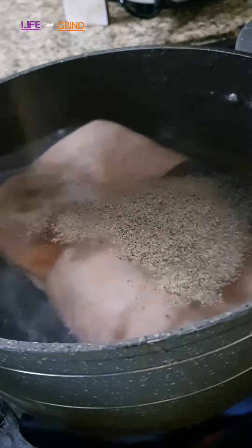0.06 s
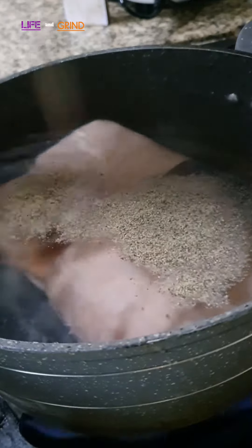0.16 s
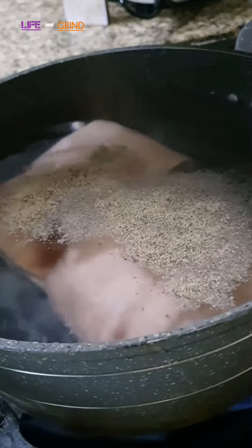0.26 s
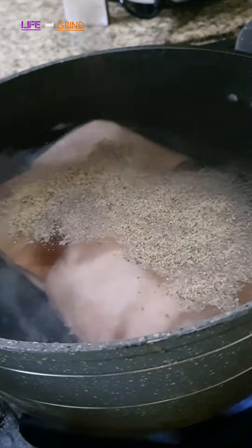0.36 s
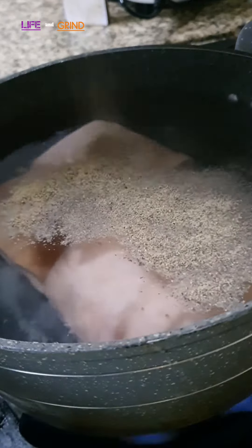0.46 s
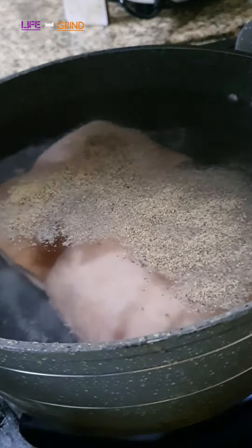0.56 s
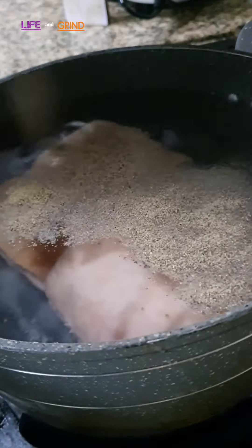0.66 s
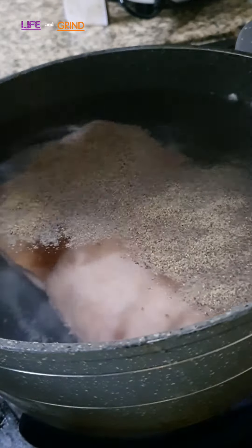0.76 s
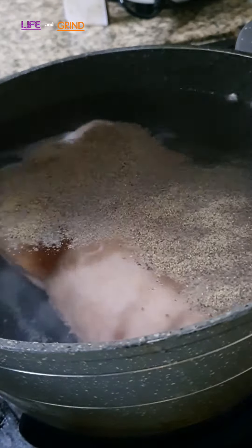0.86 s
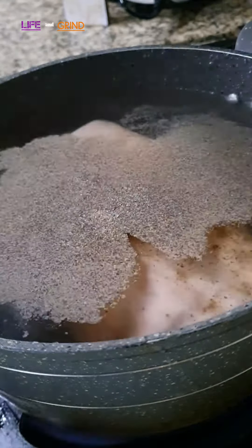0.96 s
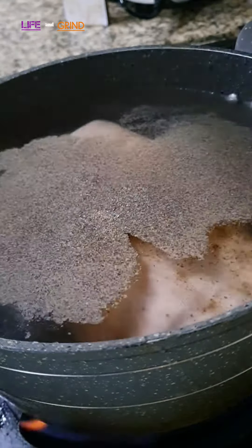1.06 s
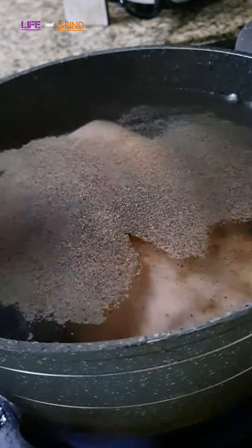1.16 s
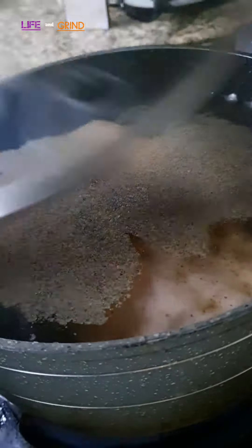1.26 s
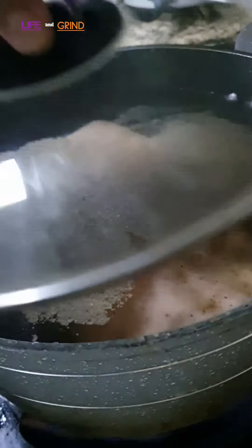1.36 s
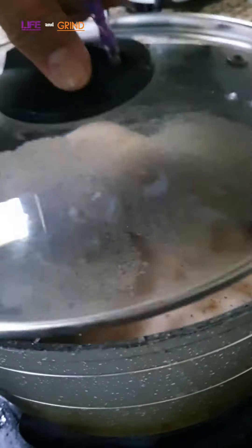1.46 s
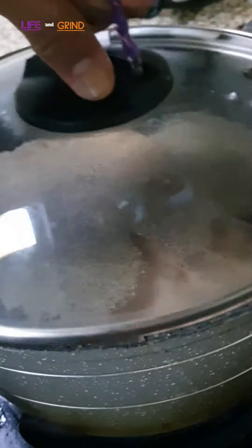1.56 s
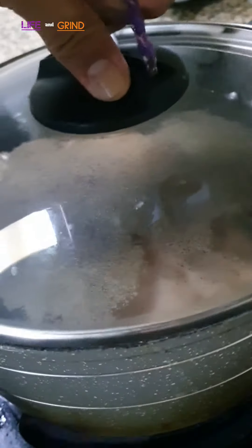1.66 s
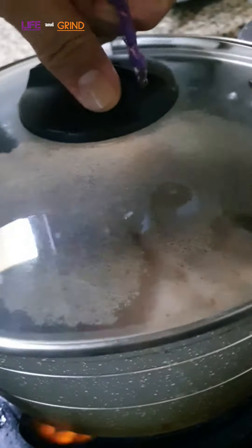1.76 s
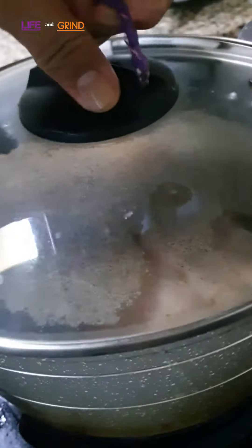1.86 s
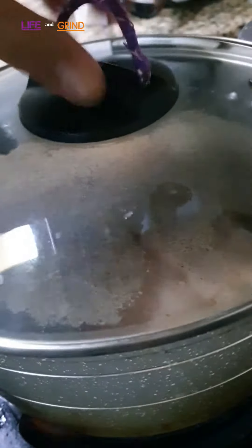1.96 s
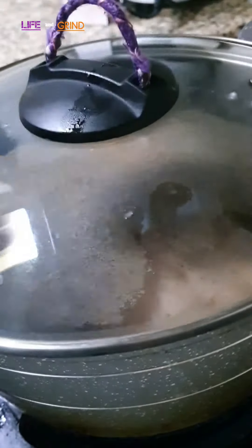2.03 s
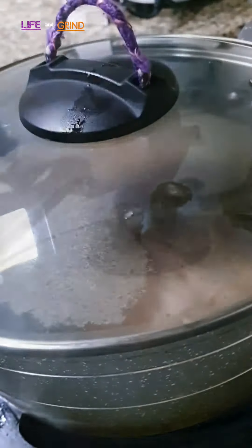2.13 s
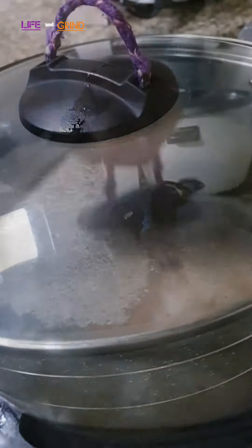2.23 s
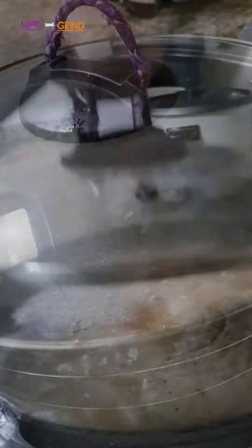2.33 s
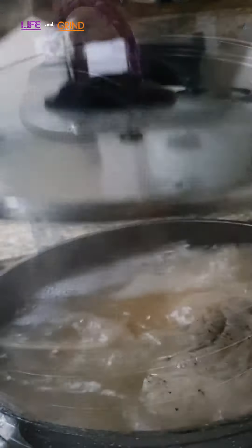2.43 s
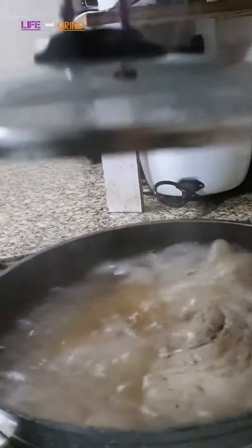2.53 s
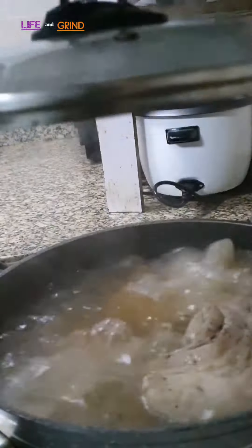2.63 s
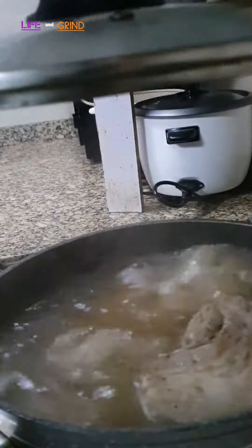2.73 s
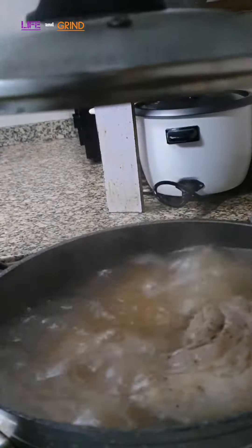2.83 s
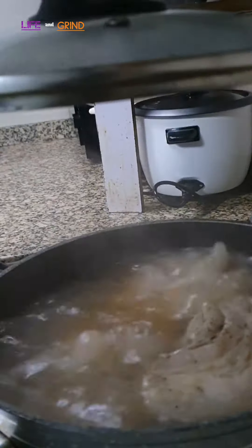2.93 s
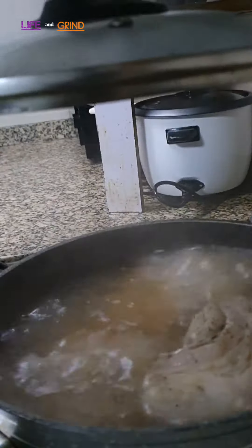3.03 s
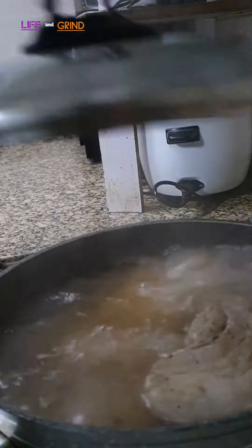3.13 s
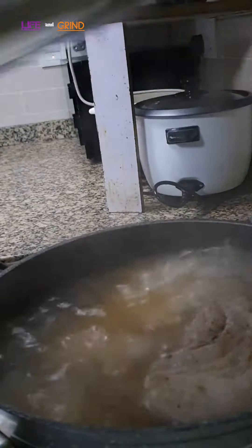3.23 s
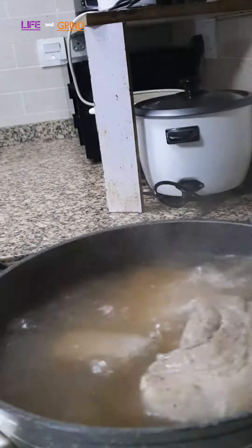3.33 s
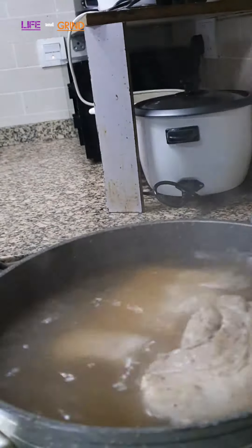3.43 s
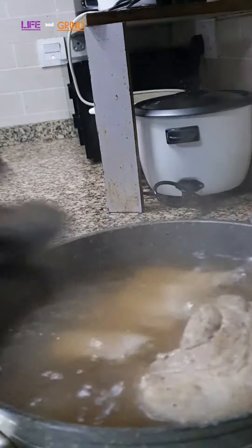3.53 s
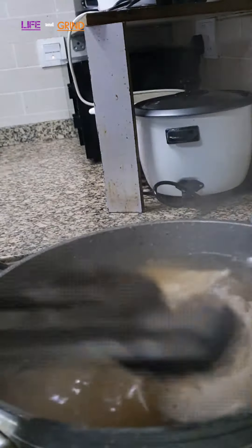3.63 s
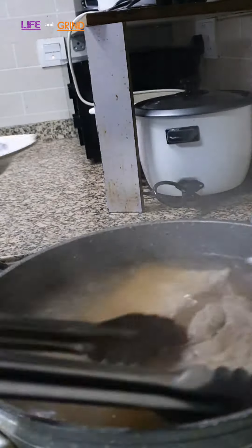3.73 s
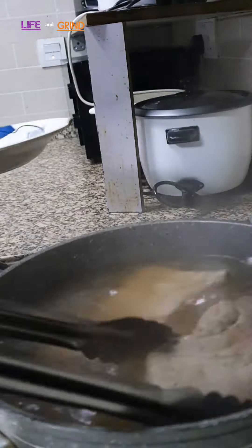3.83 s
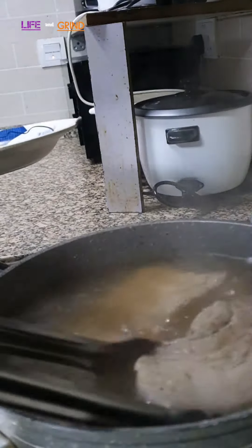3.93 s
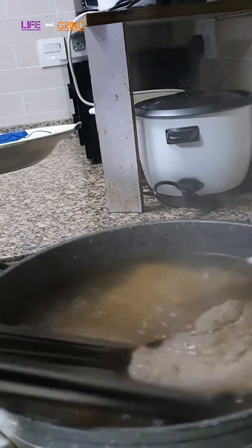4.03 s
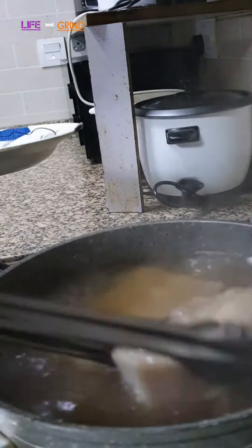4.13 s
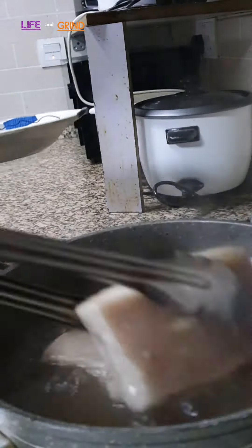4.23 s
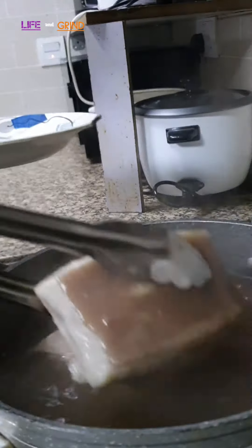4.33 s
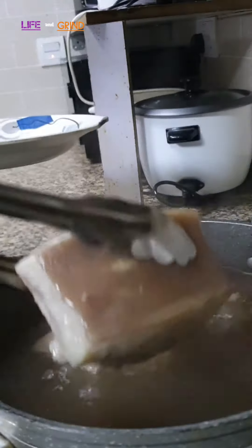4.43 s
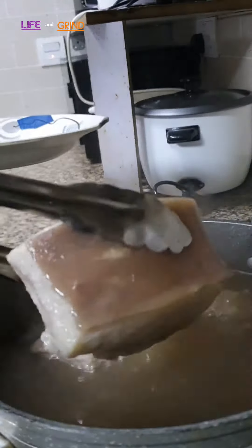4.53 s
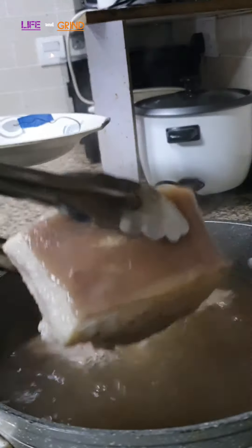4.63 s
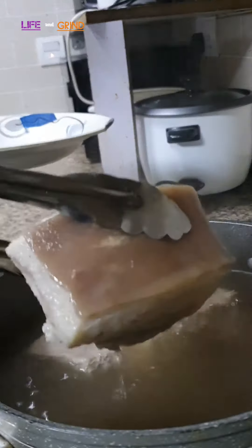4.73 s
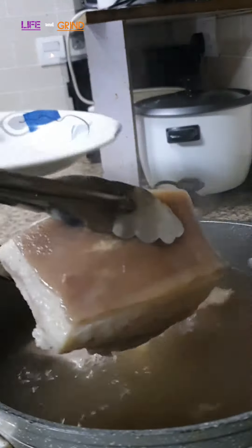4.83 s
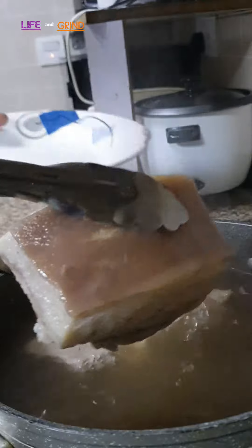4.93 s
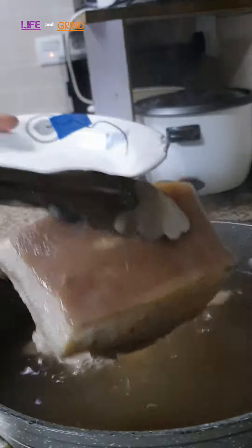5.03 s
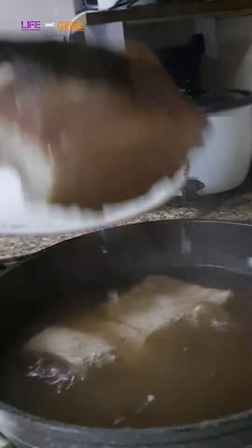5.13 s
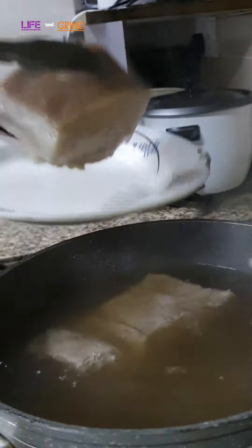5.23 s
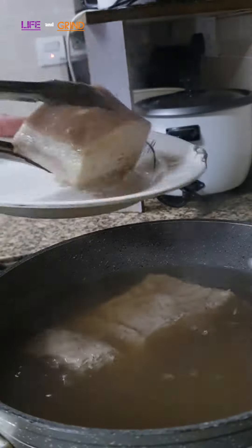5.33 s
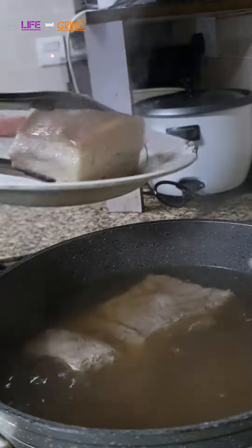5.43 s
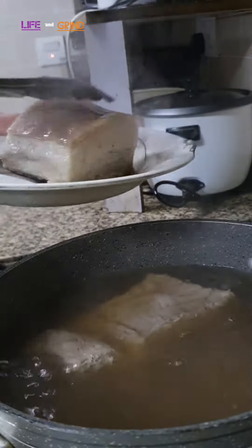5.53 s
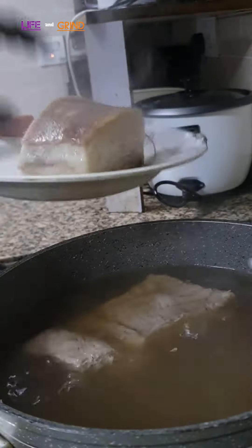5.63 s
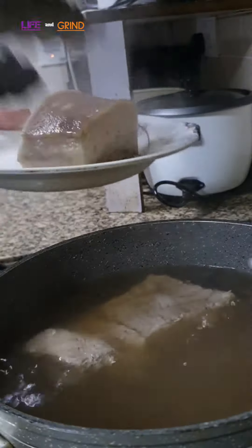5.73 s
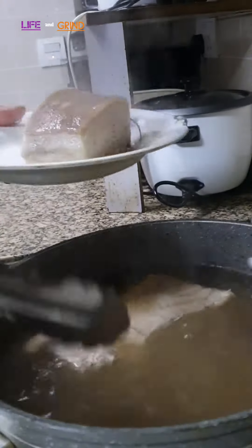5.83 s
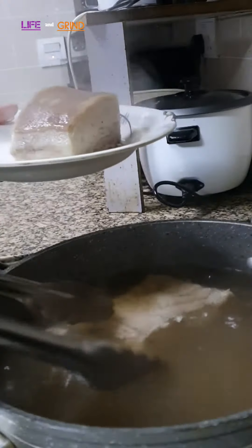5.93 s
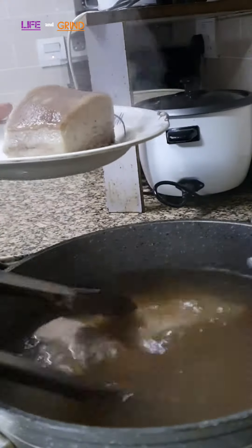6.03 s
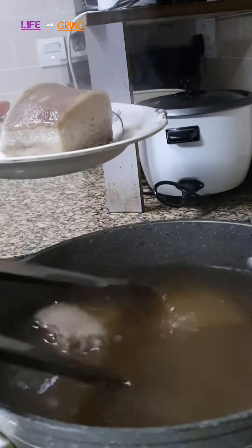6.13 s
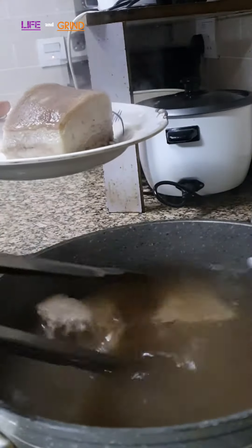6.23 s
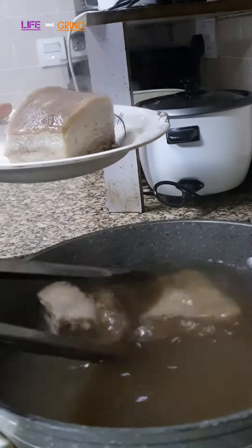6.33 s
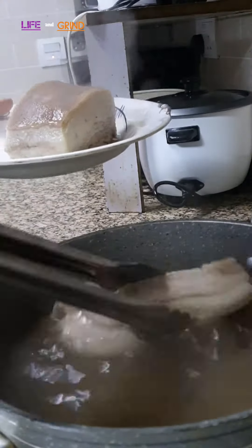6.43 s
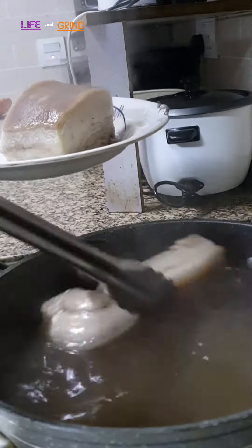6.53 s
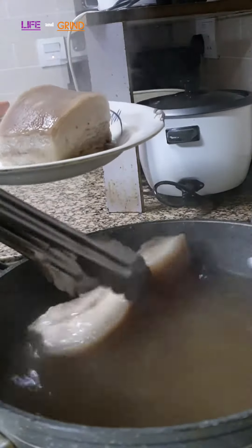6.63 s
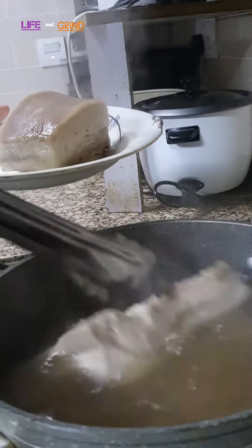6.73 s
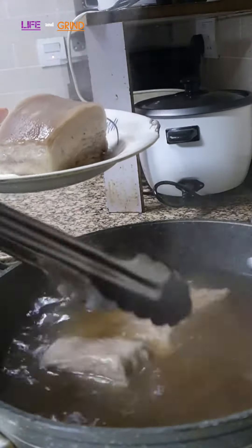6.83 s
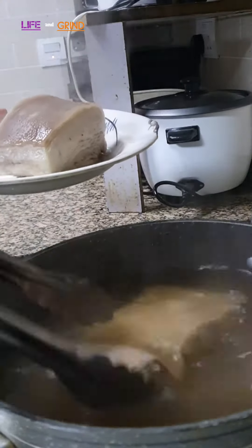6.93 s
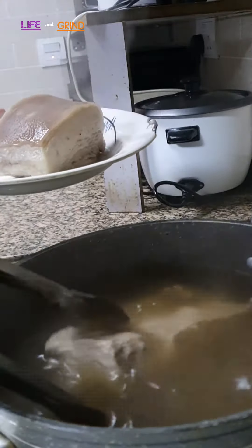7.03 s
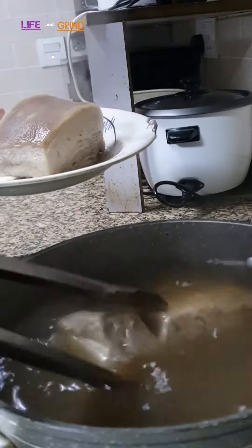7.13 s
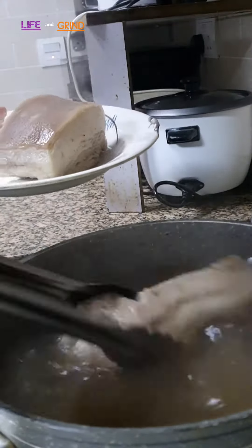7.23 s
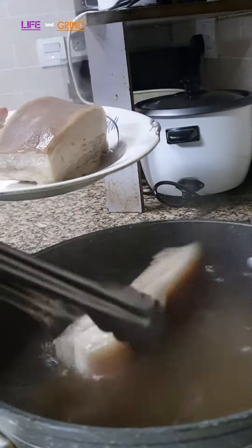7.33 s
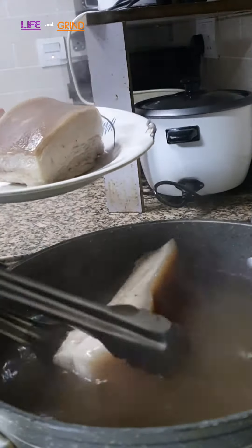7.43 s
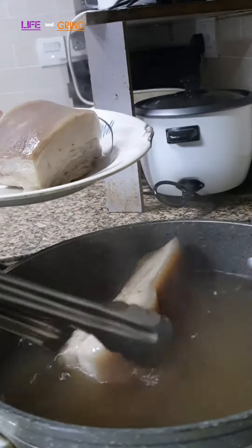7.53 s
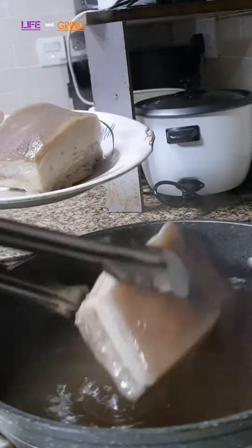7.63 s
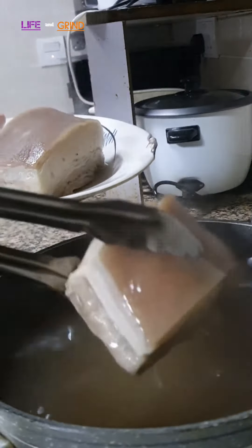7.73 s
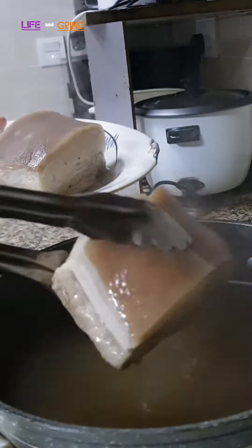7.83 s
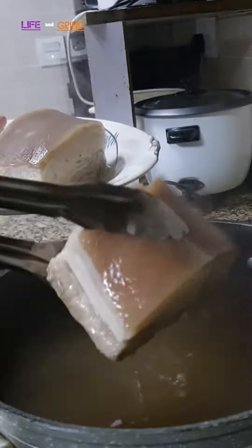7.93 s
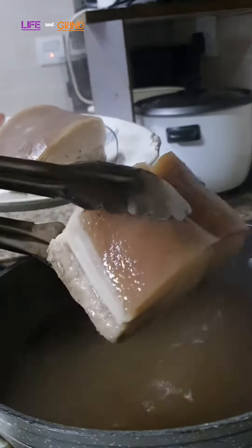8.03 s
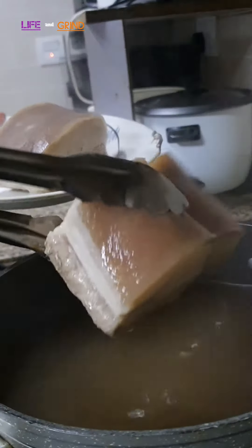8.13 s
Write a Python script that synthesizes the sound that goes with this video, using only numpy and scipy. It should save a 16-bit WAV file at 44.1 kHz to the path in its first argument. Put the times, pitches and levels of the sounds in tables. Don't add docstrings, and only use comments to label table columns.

```python
import sys
import numpy as np
from scipy import signal
from scipy.fft import rfft, irfft
from scipy.io import wavfile
from scipy.ndimage import uniform_filter1d, minimum_filter1d

SR = 44100
rng = np.random.default_rng(int(sys.argv[2]) if len(sys.argv) > 2 else 0)


def pcm_store(signal):
    levels = np.round(np.clip(np.atleast_2d(signal), -1, 1) * 32767)
    wavfile.write(sys.argv[1], SR, levels.astype(np.int16).T)


def boost(x):
    u = np.asarray(x, float) / 20
    return 10 ** u


N = 361179
MOTOR_OFF_S = 2.6098


def evened(x):
    return x / np.sqrt(np.mean(x ** 2) + 1e-20)


def read(points, hz):
    f, value = np.transpose(points)
    return np.interp(np.log(hz + 1), np.log(f + 1), value)


def along(rows, count=1):
    return np.interp(np.arange(N) / SR, np.transpose(rows)[0], np.transpose(rows)[count])


def swells(t, s, length_s, db):
    return db * np.exp(-(2 * (t - s) / length_s) ** 2)


def add(mix, s, sound, pan_db):
    part = mix[:, round(s * SR):][:, :sound.shape[-1]]
    sides = boost(np.array([[pan_db / 2], [-pan_db / 2]]))
    part += (sound * sides)[:, :part.shape[1]]


# pitch in Hz, left minus right in dB.
SIDE_LEAN = [(60, -1.5), (150, -2.0), (380, -2.5), (950, -2.5), (2380, -1.5), (7200, -3.5), (10000, 1.0),
             (15000, 3.5)]


def turbulence(tone, peaks, likeness, patchy_db, flicker_db, treble_db=0.):
    frames, hz = N // 256 + 5, np.fft.rfftfreq(1024, 1 / SR)
    a, b, c, d, patches = rng.standard_normal((frames, 513, 5)).T
    flicker = evened(uniform_filter1d(patches[0], size=3))
    patches = uniform_filter1d(patches, size=10, axis=0)
    patches = evened(uniform_filter1d(patches, size=12, axis=1))
    resonance_db = sum(db / (1 + (2 * (hz - f) / width) ** 2) for f, width, db in peaks)
    colour_db = read(tone, hz) + resonance_db
    treble_in_time = np.resize((treble_db * np.ones(N))[::256], frames)
    treble_db = np.outer(np.clip(hz / 4000 - 1, 0, 1), treble_in_time)
    same = np.clip(read(likeness, hz), -1, 1)[:, None]
    left, other = a + 1j * b, c + 1j * d
    z = np.array([left, same * left + np.sqrt(1 - same ** 2) * other])
    z[1] /= boost(read(SIDE_LEAN, hz))[:, None]
    z *= boost(colour_db[:, None] + patchy_db * patches + flicker_db * flicker + treble_db)
    return evened(signal.istft(z, nperseg=1024, noverlap=768)[1][:, :N])


def band_noise(length, hz, octaves):
    f = np.fft.rfftfreq(length, 1 / SR) + 1
    shared, own = rng.standard_normal(length), rng.standard_normal((2, length))
    band = np.exp(-(np.log2(f / hz) / octaves) ** 2 - (f / 17500) ** 2.4)
    return evened(irfft(rfft(shared + 2.2 * own) * band, length))


def wavering(blur_hz, steady, length):
    r = np.exp(-np.pi * blur_hz / SR)
    a, b = rng.standard_normal((2, 2, length))
    waver = signal.lfilter([1], [1, -2 * r, r * r], a + 1j * b)
    return steady + waver / np.sqrt(np.mean(abs(waver) ** 2))


def hits(events, modes, room_db=-12, crack_hz=2400, lag_s=.00018, octaves=1.1, rise_s=0.00024):
    out, t = np.zeros((2, N)), np.arange(8000) / SR
    late = np.maximum(t - np.array([[0], [lag_s]]), 0)
    for s, db, pan_db, pitch, crack_db in events:
        ring = sum(boost(m_db - 60 * late / min(t60, .15)) * np.sin(2 * np.pi * hz * pitch * late)
                   for hz, m_db, t60 in modes)
        ring = ring * np.minimum(t / rise_s, 1)
        crack = band_noise(len(t), crack_hz, octaves) * boost(-60 * t / 0.016)
        blow = ring / abs(ring).max() + boost(crack_db) * crack
        blow = blow * np.minimum(t / 0.00025, 1)
        scatter = rng.standard_normal((2, len(t))) * boost(-60 * t / 0.095) * (t > .002)
        scatter /= np.linalg.norm(scatter[0])
        echo = signal.fftconvolve(blow, scatter, axes=1)[:, :len(t)]
        add(out, s, boost(db) * (blow + boost(room_db) * echo), pan_db)
    return out


# pitch in Hz, level in dB.
AIRFLOW_TONE = [(150, -42), (250, -12.5), (413, -8.5), (594, -1.5), (784, -11.5), (916, -1.5),
                (1390, -17.5), (1930, -15), (5940, -25), (7190, -29), (8250, -28), (14400, -27.5),
                (15700, -43)]
# pitch in Hz, width in Hz, boost in dB.
HOUSING = [(615, 86, 5.2), (940, 75, 3.4), (2090, 84, 3.3)]
# pitch in Hz, left-right likeness (1 is equal).
MOTOR_SAME = [(60, 0.99), (130, 0.34), (290, 0.59), (640, 0.82), (1410, 0.0062), (3100, 0.2), (6820, 0.014),
              (15000, 0.02)]
SHAFT_MULTIPLES = [1, 10, 18, 34, 35, 36, 37, 38, 36, 54, 72, 73, 71, 72, 24, 25, 26]
# level against the whine in dB, blur in Hz.
SHAFT_LEVELS = [(11, 16.3), (-11.5, 32), (0.5, 60), (-38, 25), (-5.5, 30), (0.5, 80), (-11.5, 21),
                (-16, 25), (-9, 1300), (-17.5, 55), (-10, 60), (-10, 44), (-20, 46), (-13, 870), (-20, 20),
                (-23, 27), (-22, 22)]
# time in seconds, whine level in dB, half-whine against it in dB.
LOAD = [(0.0, -42.5, -17.5), (.2, -42, -18), (0.36, -46.5, -8), (.65, -46, -7), (0.95, -43.5, -3.5),
        (1.2, -44.5, -9.5), (1.4, -45, -5.5), (1.65, -48.5, -3), (1.89, -50.5, -8), (2.1, -49.5, -4.5),
        (2.35, -49, -4.5), (2.6, -47, -1)]
# time in seconds, half-whine pitch in Hz.
SPEED = [(1.0, 3572), (1.18, 3552), (1.5, 3564), (1.75, 3568), (1.9, 3550), (2.2, 3560), (2.45, 3552),
         (2.61, 3566)]


def motor():
    slot_order, steady_hz, first_change_s = 36, 7121, 1.0035
    length = round(MOTOR_OFF_S * SR)
    t = np.arange(length) / SR
    climb = np.sin(np.pi / 2 * np.minimum(t / .9, 1)) ** 1.15
    whine_hz = np.where(t < first_change_s, 6900 + 340 * climb, 2 * along(SPEED)[:length])
    turns = np.cumsum(whine_hz / slot_order) / SR
    lines = np.zeros((2, N))
    for order, (db, blur_hz) in zip(SHAFT_MULTIPLES, SHAFT_LEVELS):
        half_whine = order == slot_order // 2
        steady = 0.7 if half_whine else (blur_hz < 100) * 0.35
        waver = wavering(blur_hz, steady, length)
        waver = waver[[0, 0]] if order < 2 else waver
        waver = waver * boost(np.array([[.5], [-.5]]) * read(SIDE_LEAN, order * steady_hz / slot_order))
        own_db = along(LOAD, count=2)[:length] if half_whine else 0
        lines[:, :length] += boost(db + own_db) * (waver * np.exp(2j * np.pi * order * turns)).real
    air = turbulence(AIRFLOW_TONE, HOUSING, MOTOR_SAME, patchy_db=-0.05, flicker_db=1.03)
    return lines * boost(along(LOAD)) + air * boost(-35)


# start in seconds, length in seconds, level in dB, centre in Hz, width in octaves.
RUSTLES = [(1.172, 0.062, -40, 1520, 0.33), (1.169, 0.12, -41.5, 2400, 0.98),
           (3.188, 0.072, -51.5, 2320, 0.61), (3.467, 0.047, -47.5, 2400, 0.57),
           (2.767, 0.079, -58, 4500, 0.56), (3.6, 0.13, -48, 2500, 1.3), (5.538, 0.098, -53, 3000, 0.62),
           (2.621, 0.51, -61, 8000, 3.9), (3.3, 0.2, -58.5, 6000, 2.2), (5.56, .09, -62, 5000, 1.6),
           (3.228, 0.1, -53, 4940, 1.3), (3.456, 0.08, -49.5, 2970, 2), (3.59, 0.082, -49, 5000, 3.1),
           (3.68, 0.097, -52, 6000, 4.3), (3.757, 0.087, -48.5, 5000, 3.2), (3.882, .12, -65, 9000, 1.6),
           (5.527, 0.055, -53, 7000, 1.8), (5.667, 0.057, -58, 7000, 1.4), (5.845, 0.15, -65, 11000, 1.3),
           (6.463, 0.13, -68.5, 8000, .9), (6.79, 0.047, -71, 10100, 0.31)]


def rustles():
    out, size = np.zeros((2, N)), 8192 * 3
    for s, length_s, db, hz, octaves in RUSTLES:
        noise = band_noise(size, hz, octaves)
        grain = boost(1.55 * evened(uniform_filter1d(rng.standard_normal(size), size=80)))
        length = round(length_s * SR)
        swell = signal.windows.tukey(length, .85)
        add(out, s, boost(db) * (noise * grain)[:, :length] * swell, -1.5)
    return out


# start in seconds,
# peak in dB, centre in Hz, width in octaves.
GRAINS = [(1.186, -38, 1570, .2), (1.201, -38, 1600, .2), (3.4533, -36, 1700, 0.54),
          (3.481, -33, 1300, 0.43), (3.483, -37, 2500, .6), (3.489, -38, 1200, 0.46),
          (3.4875, -43, 3200, .4), (3.499, -39, 1300, .5), (3.608, -41, 2500, 0.89),
          (3.6166, -38, 3000, 1.2), (3.783, -38, 2800, .8), (3.8, -37, 2200, .9), (3.822, -41, 1500, .6),
          (3.889, -46, 900, 0.9), (5.54, -36, 7400, .12), (5.571, -40, 7300, .12), (5.593, -47, 7000, .2),
          (5.67, -44, 6300, .15), (6.229, -45, 6800, .15), (6.23, -50, 4900, .1), (6.783, -45, 10000, .1),
          (6.784, -46, 11900, .06), (6.783, -50, 5540, .12), (7.1395, -46, 4000, .6),
          (7.207, -40, 8700, .2), (7.207, -47, 13500, .2), (7.486, -43, 4700, .1), (7.486, -49, 7150, .08),
          (4.0285, -31, 7000, .08), (4.029, -38, 9500, 0.07), (2.308, -38, 4600, .12),
          (5.543, -40, 4000, .6), (5.5745, -42, 5000, .7), (5.597, -42, 4000, .7), (5.65, -48, 7000, .8),
          (3.739, -40, 5900, .3), (3.744, -43, 5600, .3), (3.579, -48, 4800, .3), (3.584, -48, 6500, .2),
          (6.49, -50, 5500, .15), (6.5, -51, 5400, .1), (7.213, -46, 2300, .3), (7.49, -46, 2600, .4),
          (4.033, -36, 2300, .3), (4.029, -41, 12000, .2), (5.676, -44, 6300, .2), (3.778, -33, 700, .4),
          (3.786, -34, 600, .4), (3.484, -38, 3200, .3)]


def grains():
    out, t = np.zeros((2, N)), np.arange(2048) / SR
    for s, db, hz, octaves in GRAINS:
        fade = boost(db - 0.5 - 60 * t / 0.02)
        add(out, s, fade * band_noise(len(t), hz, octaves) * np.minimum(t / 0.0004, 1), -1.5)
    return out


# start in seconds, peak in dB, centre in Hz, width in octaves.
TICKS = [(3.2036, -48, 3880, 0.66), (3.455, -43, 6310, 1.3), (3.485, -49, 3640, 1.2),
         (3.572, -45, 5500, 0.78), (3.663, -41, 4060, 1.8), (3.7345, -36.5, 5700, 0.97),
         (4.4089, -52, 3800, 1.7), (4.711, -54, 3690, 1.5), (5.1029, -49, 3640, 1.9),
         (5.25, -30.5, 3900, 1.16), (5.538, -39.5, 7300, 2.5), (5.5685, -43, 6000, 1.4),
         (5.592, -39.5, 6300, 1.6), (5.669, -47, 6230, 1.4), (5.8107, -50, 3560, 2.6),
         (6.222, -44, 3740, 1.4), (6.264, -52, 7000, 0.78), (6.479, -48.5, 5000, 1.6),
         (6.485, -49.5, 5600, 0.99), (6.536, -55, 5000, 1.3), (6.656, -59, 7200, .5),
         (6.781, -41, 5600, 2.1), (7.138, -46, 4700, 1.2), (7.2045, -37.5, 4930, 2.1),
         (7.481, -41.5, 3600, 1.57), (7.699, -47.5, 4500, 1.1)]


def ticks():
    out, t = np.zeros((2, N)), np.arange(6000) / SR
    tail_s = 3.16 * 0.068
    for s, db, hz, octaves in TICKS:
        fade = boost(-60 * t / .03) + boost(-5.0 - 60 * t / tail_s)
        noise = band_noise(len(t), hz, octaves) * fade
        ring = boost(-3 - 60 * t / 0.045) * band_noise(len(t), hz, .1)
        rattle = boost(2.5 * evened(uniform_filter1d(rng.standard_normal(len(t)), size=50)))
        add(out, s, boost(db - 7.0) * (noise + ring) * rattle * np.minimum(t / 0.0019, 1), -0.5)
    return out


# start in seconds, peak in dB, left minus right in dB, pitch factor, crack in dB.
BUMPS = [
    (3.772, -24, 10, 0.86, -16),
    (3.7755, -17.5, -0.5, 0.96, -21),
    (3.79, -29, -10, 0.87, -9),
]
# pitch in Hz, level in dB, time to fade by 60 dB in seconds.
POT = [(615, -6, 0.022), (683, 5.5, 0.023), (1380, -1, 0.023), (1690, 4.5, 0.015), (2140, -5, 0.033),
       (2600, -8, 0.034), (3600, -16, 0.061)]
CLICKS = [
    (4.0282, -24.5, -3, 0.99, -1),
    (4.0308, -33, -1, 0.76, -1),
    (4.0332, -48, 0, 1.2, -1),
]
# pitch in Hz, level in dB, time to fade by 60 dB in seconds.
TONGS = [(603, 9, 0.042), (2230, 7, 0.025), (3000, 7, .025), (3430, 0, .025), (4370, -11, 0.027),
         (5000, 2, 0.025), (5600, -6, 0.025), (6300, -5, .02), (7000, 8, 0.025), (9500, -8, .02)]


def tongs():
    bumps = hits(BUMPS, POT, room_db=0.0)
    return bumps + hits(CLICKS, TONGS, room_db=-9, crack_hz=4500, octaves=0.5)


# start in seconds, peak in dB, left minus right in dB, pitch factor, crack in dB.
KNOCKS = [
    (5.2492, -19, -.5, 1, -14),
    (5.2522, -14, -.5, 1, -12),
]
# pitch in Hz, level in dB, time to fade by 60 dB in seconds.
PLATE = [(931, -10, .05), (1140, 6, 0.04), (1420, -15, .05), (1730, 4, 0.027), (1840, 5, 0.053),
         (1900, 2, 0.086), (1975, -6, 0.1), (2040, -11, 0.13), (2290, -17, .035), (2600, 5, 0.039),
         (2650, -1, 0.096), (3200, -6, .05), (3460, -5, .06), (3957, -13, .05)]
THUMPS = [
    (5.2497, -14, -1.7, 1, -40),
]
# pitch in Hz, level in dB, time to fade by 60 dB in seconds.
BODY = [(152, 0.5, 0.083), (289, 0.5, 0.056), (410, 5.5, 0.04), (465, -5.5, 0.052), (524, 0, 0.085),
        (556, -6, 0.079), (663, -1, 0.033), (802, -0.5, 0.087), (850, -7, .07)]


def plate():
    knock = boost(2) * hits(KNOCKS, PLATE, room_db=-4, lag_s=.00008)
    return knock + boost(0.3) * hits(THUMPS, BODY, room_db=-2, lag_s=.00008, rise_s=0.0026)


# start in seconds, peak in dB, left minus right in dB, pitch factor, crack in dB.
LID_HITS = [
    (1.8543, -5, 0, 0.99, -30),
]
# pitch in Hz, level in dB, time to fade by 60 dB in seconds.
LID = [(147, 1.5, 0.12), (268, 4.5, 0.073), (467, -10, 0.059), (630, 14.5, 0.012), (796, -2, 0.02),
       (1026, -2, 0.075), (1106, 1, 0.027), (1490, -5.5, 0.034), (1990, 0.5, 0.019), (2270, 1, 0.018),
       (3280, -0.5, 0.017), (4500, -8.5, 0.014), (5200, -17, 0.016)]
TOUCHES = [
    (1.652, -17.5, 0, 1.03, -18),
    (1.6755, -17, -4, 0.92, -13),
    (1.686, -18, -5, 0.98, -33),
    (1.693, -13, -1, 0.98, -33),
]
# pitch in Hz, level in dB, time to fade by 60 dB in seconds.
TOUCH = [(349, -6, 0.075), (390, -16, 0.036), (594, -13.5, 0.03), (2600, -26, 0.027)]
CLACKS = [
    (1.6995, -25, -8, 0.87, -30),
    (1.7012, -8, 0.5, 1.01, -21),
    (2.308, -25, -5, 1.2, -3),
]
# pitch in Hz, level in dB, time to fade by 60 dB in seconds.
CLACK = [(113, 2.5, 0.071), (376, 2, 0.016), (597, -13, 0.098), (1050, -5, 0.032), (1600, -5.5, 0.022),
         (3320, -13, 0.026)]
THUDS = [
    (1.8445, -14, -2.2, 1, -40),
]
# pitch in Hz, level in dB, time to fade by 60 dB in seconds.
THUD = [(204, -23, 0.02), (320, 12, 0.1)]


def glass_lid():
    seat = hits(LID_HITS, LID, room_db=-10.5, crack_hz=3600, rise_s=0.001)
    touch = hits(TOUCHES, TOUCH, room_db=-24, rise_s=0.00082)
    clack = hits(CLACKS, CLACK, crack_hz=1700, rise_s=0.00049)
    return seat + touch + clack + hits(THUDS, THUD)


# pitch in Hz, left-right likeness (1 is equal).
STOVE_SAME = [(60, 1.0), (150, 1), (380, 0.78), (950, -0.19), (2380, -0.11), (5980, 0.041), (15000, -0.16)]
# pitch in Hz, level in dB.
FLAME_TONE = [(240, -30), (400, -5.5), (786, -13.5), (1020, 0), (1230, -6), (1340, -2), (1670, -13.5),
              (2160, -21), (2850, -11), (3170, -17.5), (4180, -26.5), (11200, -35), (15700, -36)]
# pitch in Hz, width in Hz, boost in dB.
BURNER = [(973, 145, 3), (1270, 36, 3.5), (2804, 64, 5), (3880, 85, 4.5), (6780, 880, 5.5),
          (7750, 1800, -5.5), (11000, 1300, 4.5)]
# pitch in Hz, blur in Hz, level against the hiss in dB,
# change in dB while the lid is still near.
JETS = [
    (1014, 74, -21.5, 19.5),
    (1327, 27, -7.5, -24),
    (2873, 44, -13, -1),
]


def flame():
    t = np.arange(N) / SR
    lid_treble_db = -2.5 + 4.5 * np.clip((4.23 - t) / .1, 0, 1)
    hiss = turbulence(FLAME_TONE, BURNER, STOVE_SAME, patchy_db=0.37, flicker_db=0.92, treble_db=lid_treble_db)
    near = np.interp(t, (3.47, 4.2), [1, 0])
    for hz, blur_hz, db, near_db in JETS:
        whistle = (wavering(blur_hz, 0.13, N) * np.exp(2j * np.pi * hz * t)).real
        hiss = hiss + boost(db + near_db * near) * whistle
    return hiss * boost(-44)


# start in seconds, peak in dB, pitch in Hz.
BUBBLES = [(2.796, -27.5, 202), (2.989, -34, 151), (3.46, -33, 161), (3.888, -32, 151), (3.98, -29, 151),
           (4.379, -26, 162), (4.529, -33, 151), (4.67, -37, 151), (4.737, -30, 151), (4.833, -27, 151),
           (5.776, -29, 150), (5.815, -28, 151), (5.844, -33, 152), (6.069, -34, 152), (6.14, -32, 151),
           (6.245, -26, 152), (6.406, -26, 154), (6.619, -35, 170), (6.758, -31, 162), (6.891, -32, 156),
           (6.99, -33, 151), (7.092, -34, 151), (7.253, -30, 175), (7.406, -31, 150), (7.549, -28, 159),
           (7.815, -34, 183), (7.906, -27, 151), (7.988, -39, 151)]


def bubbles():
    out, cycles, glide = np.zeros((2, N)), 1.3, .3
    for s, db, hz in BUBBLES:
        turns = np.arange(0, 3 * cycles, hz / SR)
        shape = turns / cycles * 3
        swell = np.e * shape * np.exp(-shape)
        rising_tone = np.sin(2 * np.pi * turns * (1 + glide * turns / cycles))
        add(out, s, boost(db - 3.5) * swell * rising_tone, -2.2)
    return out


# pitch in Hz, level in dB.
RUMBLE_TONE = [(8.8, -34), (15, -12), (70, 1), (194, -12.5), (337, -24.5), (372, -27), (425, -31),
               (528, -36), (689, -26.5), (800, -35), (1040, -91), (1760, -120)]
# middle in seconds, length in seconds, lift in dB.
GURGLES = [(.3, .2, 2.5), (.6, .12, 3), (1.2, .15, 0), (1.65, .15, 3.5), (2.35, .15, -3.5), (2.75, .2, -1),
           (3.195, 0.18, -5), (3.452, 0.13, -3), (3.703, 0.13, 3.5), (4.15, 0.17, -4), (4.75, .2, 0),
           (5.45, 0.25, -6.5), (5.696, 0.13, -6), (6.2, 0.21, 2), (6.5, .2, -1.5), (6.9, .25, -2.5),
           (7.15, .15, -4.5), (7.555, .12, 2), (7.857, .15, 1)]
# middle in seconds, length in seconds, rumble lift in dB, deep throb lift in dB.
SURGES = [(0, 0.12, 9, 12.5), (1.063, 0.21, -2.5, 11.5), (1.283, 0.42, 4, -18), (1.517, 0.06, 2, 9),
          (1.7, 0.16, 6.5, -15), (2.194, 0.2, 2, -31), (2.319, 0.043, 7, 13), (2.59, 0.11, 2, 0),
          (2.96, 0.11, -2, 15), (3.316, 0.092, -5, 12.5), (3.91, 0.087, 0.5, 10), (4.387, 0.07, 3, -17),
          (5.037, 0.19, -3.5, 13.5), (5.85, 0.12, 3.5, -5), (6.584, 0.14, -1, 16), (6.755, 0.12, -4, 12),
          (7.176, 0.18, 0.5, 7), (7.434, 0.048, -3, 16), (7.58, 0.06, 1.5, 11), (7.85, 0.38, -1.5, 8.5),
          (8.056, 0.093, 0, 7)]


def rumble():
    hz, t = np.fft.rfftfreq(N, 1 / SR), np.arange(N) / SR
    left, other = rfft(rng.standard_normal((2, N)))
    same = np.clip(read(STOVE_SAME, hz), -1, 1)
    right = (same * left + np.sqrt(1 - same ** 2) * other) / boost(read(SIDE_LEAN, hz))
    pair = np.array([left, right])
    deep = 1 / (1 + (hz / 60) ** 3.4)
    upper = 1 / (1 + (140 / (hz + 1)) ** 6)
    level_db = -35 + 5 * (t < MOTOR_OFF_S)
    gurgle_db = -1 + sum(swells(t, *row) for row in GURGLES)
    out = 0
    for share, db, column in ((1 - deep, 0, 2), (deep, -8.5, 3)):
        spectrum = pair * np.sqrt(share) * boost(read(RUMBLE_TONE, hz))
        gurgle = irfft(spectrum * upper, N) * boost(gurgle_db)
        low = evened(irfft(spectrum * (1 - upper), N) + gurgle)
        chance_swell = np.sqrt(uniform_filter1d((low ** 2).mean(0), size=3000) + .01)
        heave_db = sum(swells(t, row[0], row[1], row[column]) for row in SURGES)
        out = out + low / chance_swell ** 0.97 * boost(level_db + db + heave_db)
    return out


def scene():
    early = np.arange(N) / SR < MOTOR_OFF_S
    low = rumble() * np.where(early, 1, -1)
    steady = low + np.where(early, motor(), flame())
    contacts = glass_lid() + plate() + tongs() + grains() + ticks()
    return steady + contacts + rustles() + bubbles()


def thin_treble(x, from_hz, weak_db, hole_db):
    hz, t, z = signal.stft(x, SR, nperseg=2048)
    power = abs(z) ** 2 + 1e-20
    band_db = 10 * np.log10(uniform_filter1d(power, size=12, axis=1) + 1e-20)
    usual_db = uniform_filter1d(band_db, size=70, axis=1)
    weak = 10 * np.log10(power) < usual_db + weak_db
    lost = weak | (band_db < np.maximum(usual_db + hole_db, -110))
    blocks = rng.random((65, z.shape[2] // 2 + 1)) < .11
    blocks = np.kron(blocks, np.ones((16, 2), bool))[:len(hz), :z.shape[2]]
    top_db = band_db[:, (hz > 12000) & (hz < 13500)].mean(axis=(0, 1))
    burst = top_db > minimum_filter1d(top_db, size=40) + 2 * 3.5
    burst = burst | (t > 2.61) & (t < 3.27)
    lost = (lost | blocks) & ~burst
    wander = np.repeat(rng.standard_normal(z.shape[2]), 3)[:z.shape[2]]
    top_hz = 15780
    edge_hz = np.where(burst, top_hz, np.minimum(14950 + 400 * wander, top_hz))
    z = np.where(lost & (hz > from_hz)[:, None] | (hz[:, None] > edge_hz), 0, z)
    return signal.istft(z, SR, nperseg=2048)[1][:, :N]


def top_cut(x):
    return signal.sosfilt(signal.butter(12, 15810, fs=SR, output="sos"), x)


# start in seconds, end in seconds.
SILENCES = [
    (.9951, 1.0035),
    (3.4331, 3.4367),
    (5.6512, 5.6702),
]
# time in seconds, size of the jump.
JUMPS = [
    (1.0035, .03),
    (2.6098, .085),
    (5.6702, .022),
]


def record(dry):
    t = np.arange(N) / SR
    on = np.prod([(t < a) | (t >= b) for a, b in SILENCES], axis=0)
    thinned = thin_treble(dry, from_hz=7700, weak_db=0, hole_db=-1.7)
    jump = sum(size * (t >= s) * np.exp(-abs(t - s) / .0015) for s, size in JUMPS)
    return top_cut(thinned * uniform_filter1d(on * 1., size=36) + jump)


dry = scene()
out = record(dry)
pcm_store(out)
```